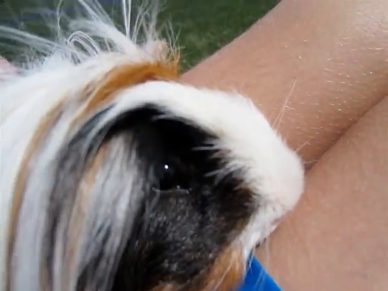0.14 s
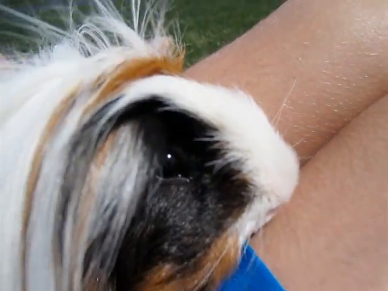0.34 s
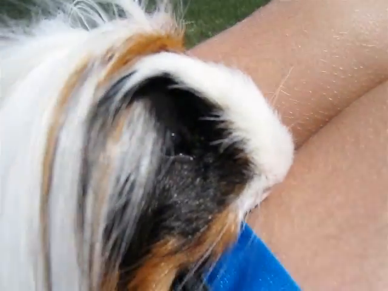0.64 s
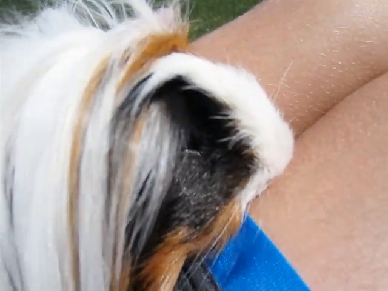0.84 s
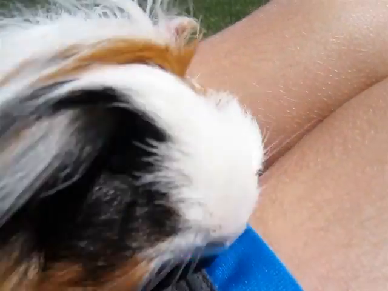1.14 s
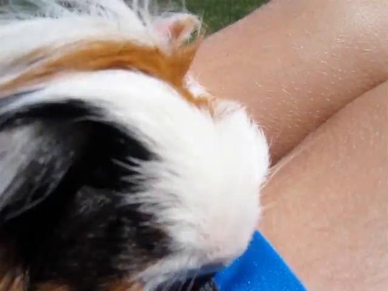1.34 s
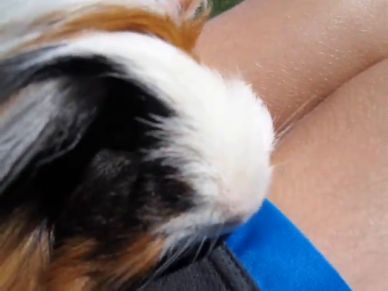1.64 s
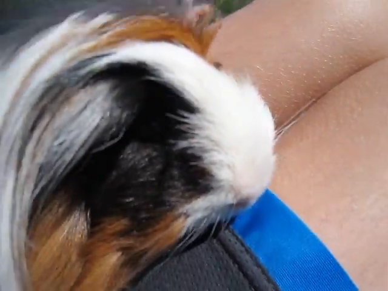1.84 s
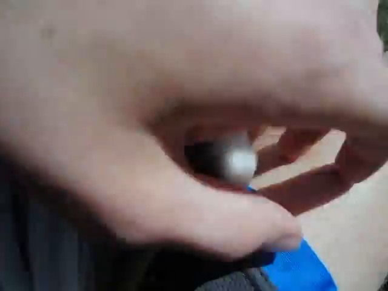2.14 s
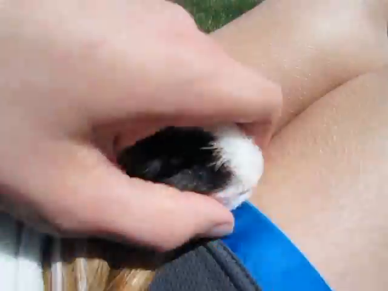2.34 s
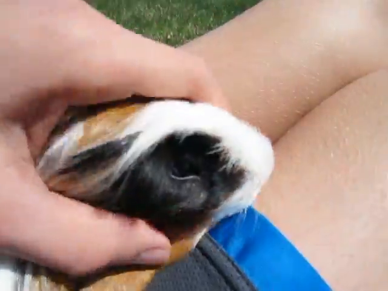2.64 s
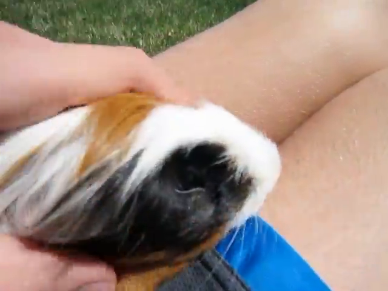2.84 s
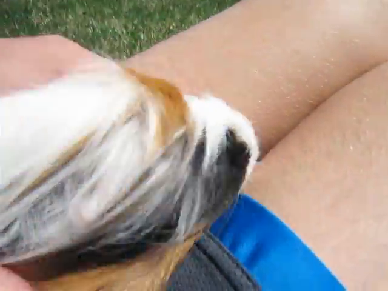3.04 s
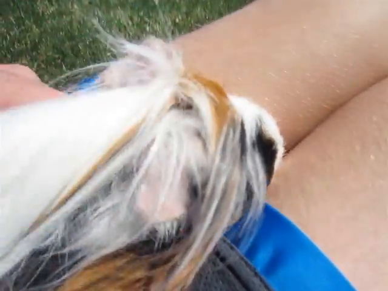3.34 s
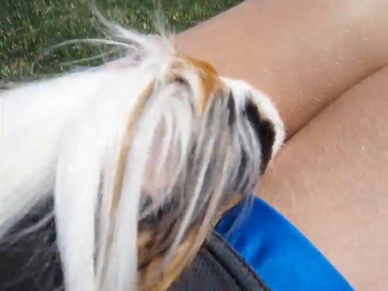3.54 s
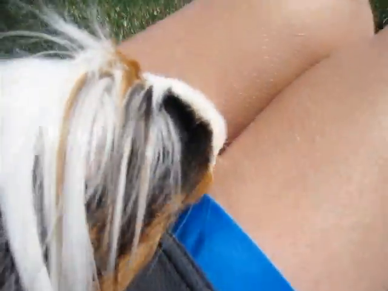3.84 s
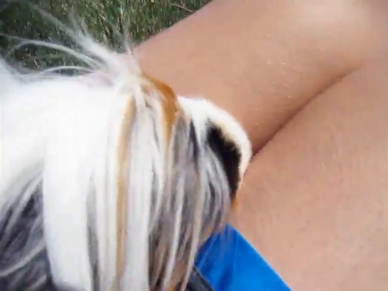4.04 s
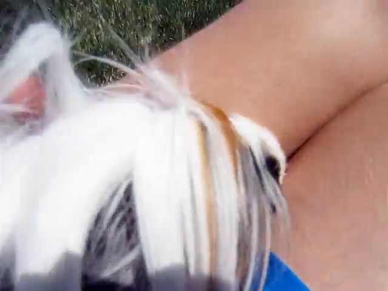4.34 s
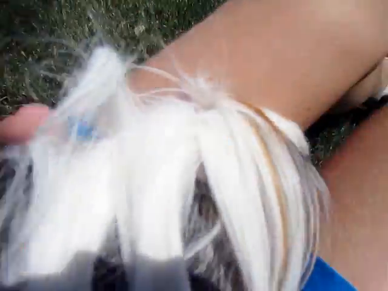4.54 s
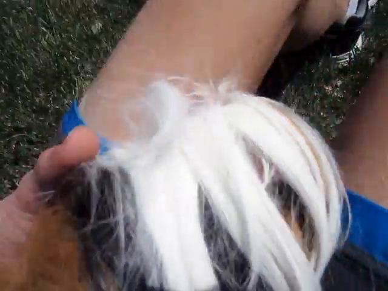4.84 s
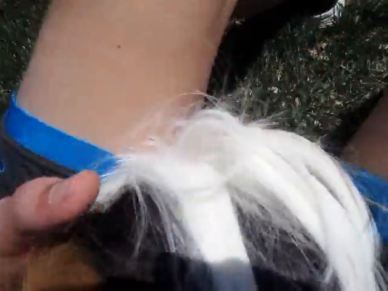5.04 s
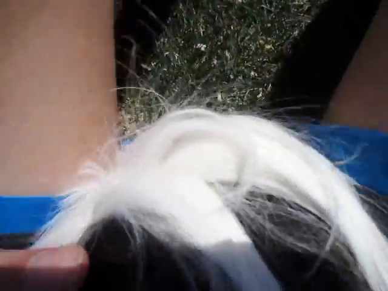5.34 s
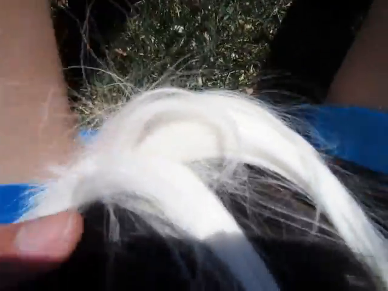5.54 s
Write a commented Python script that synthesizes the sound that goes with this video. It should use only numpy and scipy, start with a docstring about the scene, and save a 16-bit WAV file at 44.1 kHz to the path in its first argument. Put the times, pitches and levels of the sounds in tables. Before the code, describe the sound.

A guinea pig squeaks close by, a few single times and then in a quick run, over faint outdoor air.

```python
"""Outdoors, over a wash of air, a far engine's hum and a camera's faint whine, a hand strokes the long fur
of a guinea pig on a lap, and an airy tone sounds twice in the distance. From 0.9 s the animal squeaks
close to the microphone, first singly, then from about 3 s to 5 s in a quick run. Its vocal folds alternate
between clean whistled notes, raspy low grunts and creaks of slow separate pulses.
At the end the camera, which has ticked now and then, gives a cluster of ticks as it is moved."""
import sys
import numpy as np
from scipy import signal
from scipy.io import wavfile
from scipy.ndimage import uniform_filter1d

SR = 44100
rng = np.random.default_rng(int(sys.argv[2]) if len(sys.argv) > 2 else 0)


def bounce(signal):
    """Save signal as a 16-bit WAV file at the path given by the first command-line argument."""
    frames = np.transpose(np.atleast_2d(signal))
    limited = np.clip(frames, -1, 1)
    pcm = np.round(limited * 32767).astype(np.int16)
    wavfile.write(sys.argv[1], SR, pcm)


N = 250929
TIME = np.arange(N) / SR


def from_db(db):
    return 10 ** (np.asarray(db) / 20)


def rms_one(x):
    return x / np.sqrt(np.mean(x ** 2) + 1e-20)


def in_time(rows):
    """Linear interpolation of a curve's columns at every sample."""
    s, *columns = np.transpose(rows)
    return [np.interp(TIME, s, c) for c in columns]


def at_hz(points, hz):
    """Interpolation of a spectrum on a log-frequency axis."""
    frequencies, levels = np.transpose(points)
    return np.interp(np.log(hz), np.log(frequencies), levels)


def add(track, s, sound):
    """Superposition of a sound on the track at time s."""
    i = int(s * SR)
    track[i:i + len(sound)] += sound[:N - i]


def filtered(x, order, hz, kind="low"):
    """Butterworth filtering, flat in the passband."""
    return signal.sosfilt(signal.butter(order, hz, kind, fs=SR, output="sos"), x)


def mean_power(x, window_s):
    """Short-time power: a moving average of the squared signal."""
    return np.maximum(uniform_filter1d(x ** 2, int(window_s * SR)), 0)


def drift(rate_hz):
    """Low-pass noise: a smooth random fluctuation of rms 1."""
    r = np.exp(-80 * np.pi * rate_hz / SR)
    slow = signal.lfilter([1], [1, -2 * r, r * r], rng.standard_normal(N // 40 + 2002))[2000:]
    return np.interp(np.arange(N) / 40, np.arange(len(slow)), rms_one(slow))


def place(x, pan_db, lag):
    """Direction from level and time differences: the left side is pan_db louder and lag samples later."""
    return np.array([np.interp(TIME - lag / SR, TIME, x) * from_db(pan_db / 2), x * from_db(-pan_db / 2)])


def banded_noise(spectrum, flicker_db):
    """Partly coherent stereo noise of rms 1, each band fluctuating in level on its own."""
    # likeness of left and right: (frequency [Hz], correlation [-1 to 1])
    likeness = [(50, -0.24), (130, -0.22), (290, -0.4), (640, -0.32), (1400, -0.14), (3100, -0.0037),
                (7000, 0.079), (15000, -0.2)]
    edges = np.r_[np.geomspace(20, 6000, 17), np.linspace(7000, 16000, 10)]
    out, white = 0, rng.standard_normal((2, 2, N))
    for k, (low, high) in enumerate(zip(edges, edges[1:])):
        mid, side = filtered(white[k % 2], 2, [low, high], "band")
        hz = np.sqrt(low * high)
        alike = at_hz(likeness, hz)
        gain = from_db(at_hz(spectrum, hz) + flicker_db * drift(13.6))
        out = out + gain * (np.sqrt(1 + alike) * mid + np.sqrt(1 - alike) * side * [[1], [-1]])
    return rms_one(out)


def camera_whine(tones_hz=(7853, 7900), level_db=-82.5):
    """Beating: two thin, wavering tones lie close in frequency."""
    whine = sum(np.sin(2 * np.pi * np.cumsum(hz + 4 * drift(10)) / SR) for hz in tones_hz)
    return np.sqrt(2) * from_db(level_db) * whine


def air(gain_db=4.5):
    """Broadband noise: outdoor air and microphone hiss form a nearly steady wash."""
    # spectrum of the wash: (frequency [Hz], relative density [dB])
    spectrum = [(25, -17), (60, -2.5), (120, -3.5), (250, -2.5), (600, -7.5), (1700, -15.5), (3800, -28),
                (7500, -28.5), (10000, -32.5), (12000, -33.5), (14000, -38), (16000, -39)]
    # its slow course: (time [s], relative level [dB])
    course = [(0.0, -54), (1.25, -56), (4.14, -52), (5.69, -52.5)]
    air_db, = in_time(course)
    return from_db(air_db + gain_db) * banded_noise(spectrum, flicker_db=2.37)


def drone(fading_db=4.5, wander=0.00591):
    """Fading in propagation: a far drone's lines waver together in pitch but fade separately."""
    # swell of the drone: (time [s], level [dB])
    course = [(0.0, -59.5), (0.16, -54.5), (0.95, -65.5), (2.58, -59), (2.82, -64.5), (5.36, -69.5),
              (5.69, -61)]
    # its spectral lines: (frequency [Hz], relative level [dB])
    partials = [(121, -7.5), (160, -0.5), (200, -15), (241, -4), (282, -8.5), (321, -7.5)]
    drone_db, = in_time(course)
    clock = np.cumsum(1 + wander * drift(2.085)) / SR
    lines = sum(from_db(line_db + fading_db * drift(1.4)) * np.sin(2 * np.pi * hz * clock)
                for hz, line_db in partials)
    return place(np.sqrt(2) * from_db(drone_db) * lines, pan_db=1.0, lag=42)


def engine(gain_db=0.5, octave_db=-16):
    """Periodic firing: only the fundamental and a trace of its octave carry this far."""
    # running of the engine: (time [s], firing rate [Hz], relative level [dB])
    running = [(0.0, 83.2, -55), (0.09, 83.9, -52), (0.36, 84.3, -53.5), (1.16, 83.05, -49.5),
               (1.52, 78.7, -51.5), (1.63, 78.7, -63.5), (1.87, 78.7, -49), (2.34, 83, -52.5),
               (5.69, 83.3, -52)]
    firing_hz, engine_db = in_time(running)
    phase = 2 * np.pi * np.cumsum(firing_hz) / SR
    hum = np.sin(phase) + from_db(octave_db) * np.sin(2 * phase)
    return place(np.sqrt(2) * from_db(engine_db + gain_db) * hum, pan_db=-0.7, lag=50)


def far_tones(band_hz=(1530, 1850), roundness=0.33):
    """Narrow-band noise has a vague pitch: two faint airy swells in the distance."""
    # the swells: (start [s], length [s], level [dB])
    swells = [(0.276, .17, -58), (.55, .18, -61.5)]
    envelope = np.zeros(N)
    for s, length, level_db in swells:
        arch = np.abs(np.sin(np.linspace(0, np.pi, int(length * SR)))) ** roundness
        add(envelope, s, from_db(level_db) * arch)
    return envelope * rms_one(filtered(rng.standard_normal((2, N)), 2, band_hz, "band"))


def ticks(gain_db=9.5, soft_hz=11000):
    """Impact excitation: handling rings the heavily damped modes of the camera casing."""
    # the impacts: (time [s], relative strength [dB], contact time [ms])
    impacts = [(.246, -25, .7), (1.432, -30, .6), (3.015, -42, .1), (5.275, -37.5, .1), (5.309, -29.5, .1),
               (5.429, -31.5, .1), (5.447, -29, .1), (5.46, -33.5, .1), (5.532, -34, .1), (5.549, -31, .1)]
    # modes of the casing: (frequency [Hz], bandwidth [Hz], gain [dB])
    modes = [(1330, 1100, 8), (3370, 3300, -1), (6550, 3800, -8)]
    force, ringing = np.zeros(N), 0
    for s, strength_db, contact_ms in impacts:
        push = np.hanning(int(contact_ms * SR / 1000))  # a longer contact sounds duller
        add(force, s, from_db(strength_db + gain_db) * push / push.sum())
    for hz, width_hz, mode_db in modes:
        r = np.exp(-np.pi * width_hz / SR)
        feedback = [1, -2 * r * np.cos(2 * np.pi * hz / SR), r * r]
        mode = (1 - r * r) / 2 * signal.lfilter([1, 0, -1], feedback, force + 1e-18)
        ringing = ringing + from_db(mode_db) * mode
    return place(filtered(ringing, 2, soft_hz), pan_db=-8.5, lag=0)


def fur(gain_db=6.5, grain_db=2.1, drag_db=1.16, pan_db=-5.0, rise_share=0.58, roundness=1.34):
    """Sliding friction: hairs under the hand give a grainy swish on the right, swelling with each stroke."""
    # strokes of the hand: (firmest moment [s], length [s], relative peak [dB])
    strokes = [(0.19, 0.36, -64), (1.977, 0.29, -69.5), (2.175, .05, -58.5), (2.257, 0.12, -59.5),
               (2.684, .18, -66.5), (3.137, 0.22, -56), (3.552, 0.46, -72), (4.02, 0.17, -59.5),
               (4.218, 0.14, -52.5), (4.485, 0.081, -60.5), (4.795, 0.1, -51), (4.932, 0.31, -63.5)]
    # spectrum of the swish: (frequency [Hz], relative density [dB])
    spectrum = [(150, 9.5), (400, 11), (900, 13), (1900, 6), (3300, 1), (6000, 3), (8000, 2), (10000, -2.5),
                (12000, -5), (14000, -12), (16000, -7)]
    pressure = 0
    for s, length, peak_db in strokes:
        away = np.abs(TIME - s) / (length * np.where(TIME < s, rise_share, 1 - rise_share))
        pressure = pressure + from_db(peak_db) * np.exp(-np.minimum(away, 10) ** roundness)
    swish = banded_noise(spectrum, flicker_db=2.0)
    catching = from_db(grain_db * drift(300) + drag_db * drift(30))
    return from_db(gain_db) * pressure * swish * catching * from_db([[pan_db / 2], [-pan_db / 2]])


def skin_rub():
    """Stick-slip friction: skin catches and slides in short soft groans."""
    # the groans: (start [s], length [s], first pitch [Hz], last pitch [Hz], peak [dB])
    groans = [(4.201, 0.031, 399, 400, -42), (4.787, 0.13, 173.7, 221, -42)]
    out = np.zeros(N)
    for s, length, first_hz, last_hz, peak_db in groans:
        pitch = np.linspace(first_hz, last_hz, int(length * SR))
        add(out, s, from_db(peak_db) * np.hanning(len(pitch)) * np.sin(2 * np.pi * np.cumsum(pitch) / SR))
    return place(out, pan_db=4.0, lag=14)


def surroundings(x, echo_db=-29, t60=0.38, dull_hz=1600):
    """Diffuse scattering: legs, body and lawn return a faint dull echo, different on each side."""
    t = np.arange(SR // 4) / SR
    scatter = rng.standard_normal((2, len(t))) * from_db(-60 * t / t60) * (t > .002)
    scatter = scatter / np.sqrt(np.sum(scatter ** 2, axis=1, keepdims=True))
    return from_db(echo_db) * signal.fftconvolve(x[None], filtered(scatter, 1, dull_hz), axes=1)[:, :N]


def effort(s):
    """Vocal effort tilts the spectrum: the harder the animal calls at time s, the brighter its voice."""
    # course of the effort: (time [s], brightness [dB])
    course = [(1.1, -0.5), (2.35, -2), (2.95, -5.5), (3.25, 8.5), (3.62, 9.5), (3.83, 3.5), (4.14, 8.5),
              (4.41, 9.5), (4.65, 1), (4.9, 2.5)]
    return np.interp(s, *np.transpose(course))


def huskiness(rough, level_db=-23, band_hz=(900, 2850), follows_effort=0.2):
    """Aspiration noise: air leaking through slack folds fills the gaps between rough pulses with hiss."""
    flow = np.sqrt(mean_power(rough, window_s=0.0077))
    hiss = rms_one(filtered(rng.standard_normal(N), 6, band_hz, "band"))
    return from_db(level_db + follows_effort * effort(TIME)) * flow * hiss


def creaks(scatter_db=2.0, pitch_scatter=0.07, chest_start_db=-33, chest_fall_db_per_s=167):
    """Pulse excitation: slow separate openings of the folds each ring the throat for a few cycles."""
    # pulse trains: (start [s], length [s], pulses [count], spacing exponent [above 1 slows], level [dB])
    trains = [(2.1428, 0, 1, 1, -33.5), (2.1598, 0, 1, 1, -39), (2.33, .005, 2, 1, -36),
              (2.6123, 0.015, 3, .7, -30), (2.922, 0.042, 6, 0.86, -28), (3.0076, 0.03, 5, 1.14, -23.5),
              (3.2522, 0.011, 2, 1, -24), (3.31, 0.0081, 2, 1, -22), (3.3248, 0.014, 3, 1.4, -23),
              (3.4996, 0.016, 5, 0.83, -33), (3.521, 0.011, 2, 1, -24.5), (3.578, .0405, 7, .68, -23.5),
              (4.1372, 0, 1, 0.72, -24), (4.3477, .013, 3, 0.91, -22.5), (4.405, .013, 3, 1.09, -28),
              (4.6103, 0.044, 9, 0.8, -31), (4.877, 0.0068, 2, 1, -29.5)]
    # throat resonances: (frequency [Hz], ring length [s], delay [s], pitch rise [share], gain [dB],
    # weight of the chest term [ratio], weight of the effort [ratio])
    throat = [(366.5, .0105, .0008, 0.014, -1, 0.99, 0), (848, 0.0064, 0, 0.37, 1, 0.026, 0),
              (1160, 0.0049, .0003, 0, -6, 0.39, 0.28), (1820, .003, 0, 0.015, -18.5, 0.029, 0.97),
              (2680, .003, -.0003, 0, -25.5, 0.11, 1.4)]
    out = np.zeros(N)
    for first, span, pulses, spacing, level_db in trains:
        for s in first + span * np.linspace(0, 1, pulses) ** spacing:
            # the chest rings alike in soft and loud creaks, and fades as the folds tighten
            chest_db = chest_start_db - chest_fall_db_per_s * (s - first) - 0.12 * effort(s) - level_db
            for k, (hz, length, delay, rise, mode_db, chest_weight, effort_weight) in enumerate(throat):
                colour_db = mode_db + chest_weight * chest_db + effort_weight * effort(s)
                gain = from_db(level_db + colour_db + scatter_db * rng.normal())
                u = np.linspace(-.5, .5, int(length * SR))
                cycles = hz * (1 + pitch_scatter * rng.normal()) * length * (u + rise * u * u / 2)
                ring = np.cos(2 * np.pi * cycles + k * np.pi / 2)  # modes lie a quarter cycle apart
                add(out, s + delay - length / 2, gain * np.cos(np.pi * u) ** 2 * ring)
    return out


def folds_free(creak, shut_db=-33):
    """Creak and regular vibration exclude each other: a gain of 1 between pulses, low under a pulse."""
    return 1 / np.sqrt(1 + mean_power(creak, window_s=0.0039) / from_db(shut_db) ** 2)


def grunts(rise_hz_per_s=8100, jitter=0.083, shimmer_db=2.5, subharmonic_db=-15, roundness=0.58):
    """Source and filter: slack folds vibrate unevenly, rising as they tighten; the throat colours them."""
    # grunts that open the weaker squeaks: (start [s], length [s], middle pitch [Hz], level [dB])
    calls = [(.888, 0.0096, 396, -30), (1.0813, 0.014, 633, -26.5), (1.1497, .011, 626, -25.5),
             (2.3196, 0.0064, 440, -31), (2.335, 0.024, 610, -33.5), (2.406, 0.011, 454, -25.5),
             (2.4171, .011, 528, -31.5), (2.594, 0.015, 458, -31), (2.6657, .012, 410, -26),
             (2.677, 0.027, 578, -27)]
    # response of the throat: (frequency [Hz], gain [dB])
    throat = [(280, 1), (400, 2), (520, -8.5), (620, -2.5), (800, -4), (1000, 5.5), (1180, -2.5),
              (1380, -23), (1650, -22), (2200, -34.5), (2900, -39.5), (3500, -34), (4300, -53)]
    out, waver, shimmer = np.zeros(N), drift(220), drift(250)
    for s, length, middle_hz, level_db in calls:
        u = np.linspace(0, 1, int(length * SR))
        now = int(s * SR) + np.arange(len(u))
        pitch = (middle_hz + rise_hz_per_s * length * (u - .5)) * (1 + jitter * waver[now])
        phase, wave = 2 * np.pi * np.cumsum(pitch) / SR, 0
        for k in np.arange(2, 15) / 2:  # harmonics and the half orders between them
            colour_db = at_hz(throat, k * pitch) + effort(s) * (k > 2) + subharmonic_db * (k % 1 > 0)
            colour_db -= 7 * (k == 3)  # the open phase of the folds weakens the third harmonic
            wave = wave + from_db(colour_db) * np.sin(k * phase + rng.uniform(0, 2 * np.pi))
        if middle_hz > 500:  # higher grunts gain an undertone
            wave += from_db(subharmonic_db) * np.sin(phase / 2)
        swell = np.abs(np.sin(np.pi * u)) ** roundness * from_db(shimmer_db * shimmer[now])
        add(out, s, from_db(level_db) * swell * wave)
    return out


def notes(register_hz=755, jitter=0.019, subharmonic_db=-27, rasp_db=5.0, roundness=0.57, taper=0.22):
    """Regular fold vibration: a fundamental with weak overtones; low notes tend to period doubling."""
    # arched notes that open the stronger squeaks: (start [s], length [s], middle pitch [Hz], level [dB])
    held_notes = [(3.229, 0.028, 747, -24.5), (3.507, 0.013, 753, -23.5), (3.813, 0.042, 711, -25.5),
                  (4.036, 0.038, 709, -24), (4.113, 0.023, 746, -20), (4.319, 0.034, 762, -21),
                  (4.418, 0.02, 744, -25.5)]
    # glides that close a squeak: (start [s], length [s], middle pitch [Hz], rise [Hz], level [dB])
    whistles = [(0.898, 0.025, 661, 92, -29), (1.1057, 0.0047, 790, -110, -29),
                (1.174, 0.0057, 796, -47, -28), (2.349, 0.023, 712, 82, -32), (2.629, 0.019, 768, 152, -26),
                (2.702, 0.0073, 836, 108, -27), (2.713, 0.017, 787, -100, -23.5),
                (2.971, .009, 936, 80, -21.5), (3.052, 0.0086, 1103, 180, -19.5),
                (3.273, .005, 1132, 212, -22.5), (3.343, 0.014, 983, 150, -18),
                (3.540, .010, 1066, 210, -19), (3.6244, 0.0064, 1164, 300, -21),
                (3.843, 0.0201, 905, 500, -22), (4.071, 0.017, 975, 352, -18.5),
                (4.142, .026, 982, 440, -19), (4.366, .013, 1098, 290, -18),
                (4.441, .010, 693, -170, -28.5), (4.658, .016, 860, 167, -24),
                (4.888, 0.031, 732, 107, -28)]
    # overtones against the fundamental: (frequency [Hz], relative level [dB])
    overtones = [(1200, -3), (1450, -16.5), (1800, -24), (2300, -21.5), (2900, -30), (3400, -36),
                 (4200, -62)]
    out, waver, rasp, doubling = np.zeros(N), drift(160), drift(250), drift(60)
    held = [(s, length, (.87 * hz, hz, .94 * hz), db, 0.57) for s, length, hz, db in held_notes]
    whistled = [(s, length, (hz - .44 * rise, hz, hz + .56 * rise), db, 0.39)
                for s, length, hz, rise, db in whistles]
    for s, length, contour_hz, level_db, peak_at in held + whistled:
        u = np.linspace(0, 1, int(length * SR))
        now = int(s * SR) + np.arange(len(u))
        pitch = np.polyval(np.polyfit([0, .5, 1], contour_hz, 2), u) * (1 + jitter * waver[now])
        phase = 2 * np.pi * np.cumsum(pitch) / SR
        tight = np.clip((pitch - register_hz) / 150, 0, 1)  # tight folds give nearly a sine
        bright_db = -10 + 1.01 * effort(s) + 9 * np.log2(contour_hz[1] / register_hz)
        half_orders = np.sin(phase / 2) + 2 * np.sin(3 * phase / 2)
        wave = np.sin(phase) + from_db(subharmonic_db) * (1 - tight) * doubling[now] * half_orders
        for k in range(2, 6):
            overtone_db = at_hz(overtones, k * pitch) + bright_db * min(k / 2 - .5, 1) - 4 * tight * (k - 2)
            wave += from_db(overtone_db + rasp_db * (1 - tight) * rasp[now]) * np.cos(k * phase)
        skewed = u ** (np.log(.5) / np.log(peak_at))  # puts the swell's peak at u = peak_at
        swell = np.abs(np.sin(np.pi * skewed)) ** roundness
        fade = 1 + taper * tight * (1 - 2 * u)  # high notes start hard and taper off
        add(out, s, from_db(level_db) * swell * fade * wave)
    return out


def scene():
    """Superposition: the animal in front, handling and outdoor sounds around it."""
    creak = creaks()
    rough = grunts() + creak
    voice = notes() * folds_free(creak) + rough + huskiness(rough)
    handling = fur() + skin_rub() + ticks()
    background = engine() + drone() + camera_whine() + air() + far_tones()
    return place(voice, pan_db=-1.0, lag=2.3) + surroundings(voice) + handling + background


def record(dry):
    """Destructive interference: the microphone ports cancel a treble band; the top is cut steeply."""
    notch_hz, width_hz, cutoff_hz = 12010, 7870, 15800
    coloured = signal.lfilter(*signal.iirnotch(notch_hz, notch_hz / width_hz, fs=SR), dry)
    return signal.sosfilt(signal.ellip(10, .1, 70, cutoff_hz, fs=SR, output="sos"), coloured)


dry = scene()
out = record(dry)
bounce(out)
```